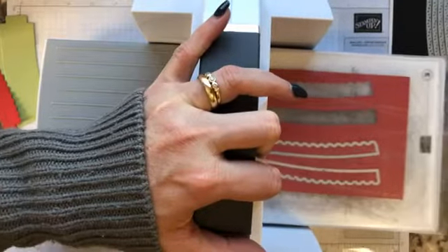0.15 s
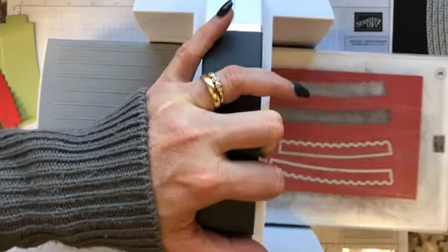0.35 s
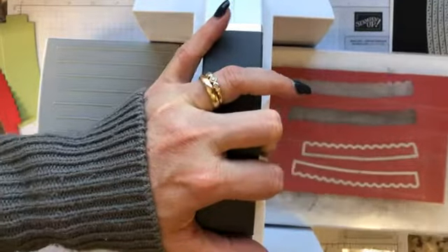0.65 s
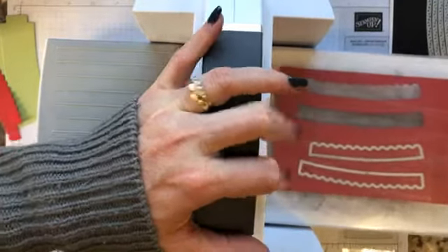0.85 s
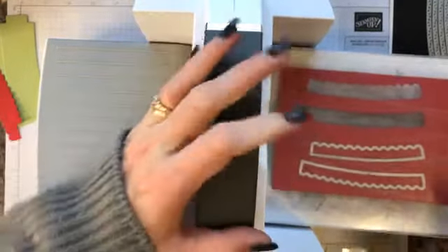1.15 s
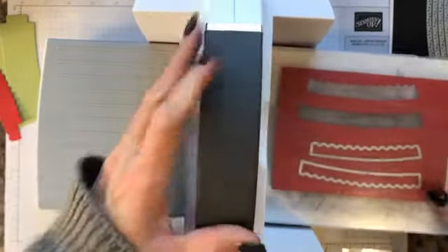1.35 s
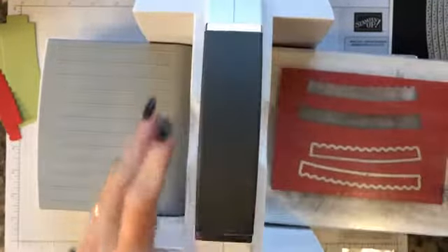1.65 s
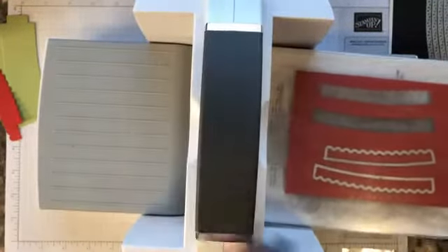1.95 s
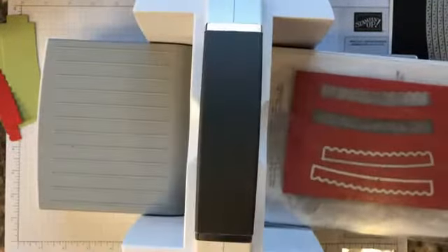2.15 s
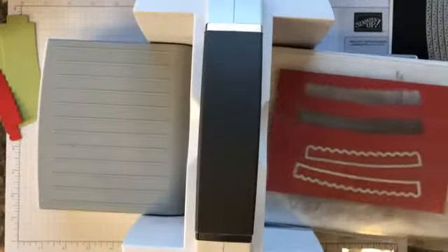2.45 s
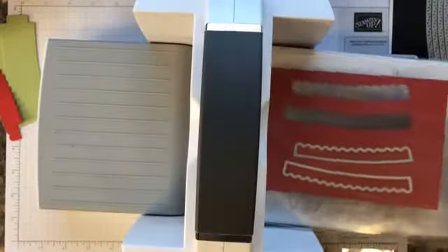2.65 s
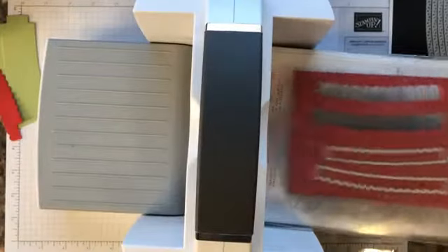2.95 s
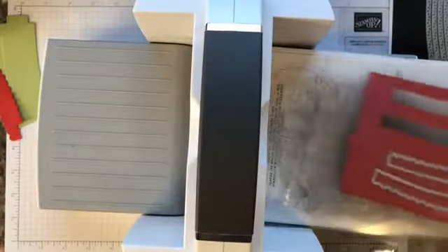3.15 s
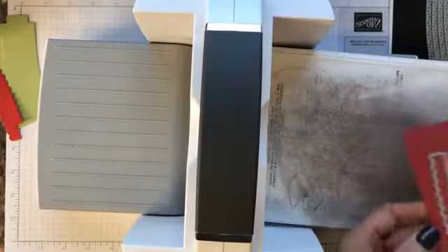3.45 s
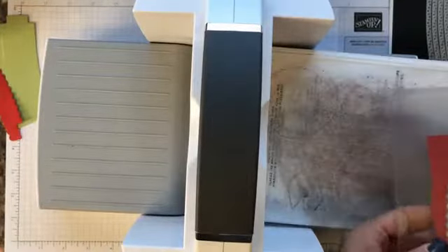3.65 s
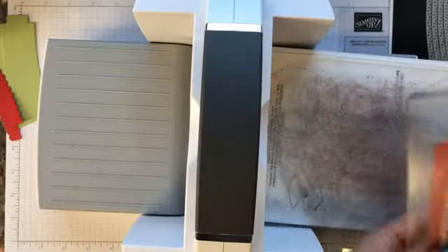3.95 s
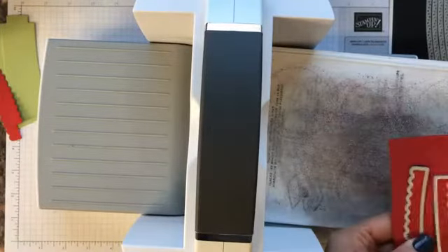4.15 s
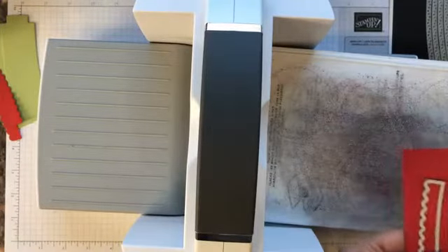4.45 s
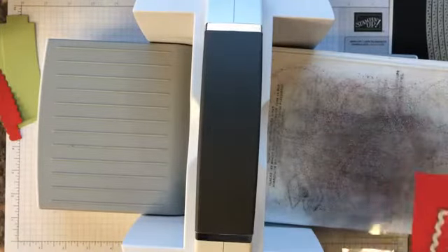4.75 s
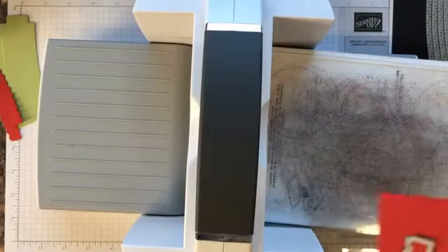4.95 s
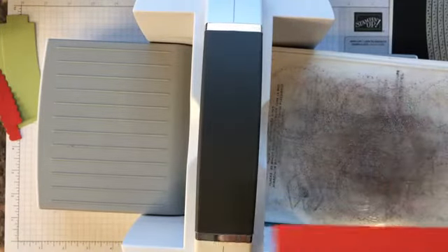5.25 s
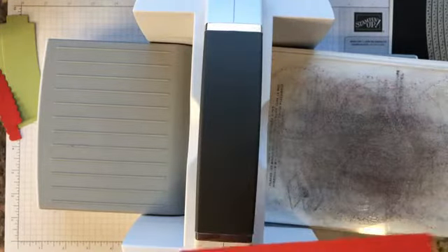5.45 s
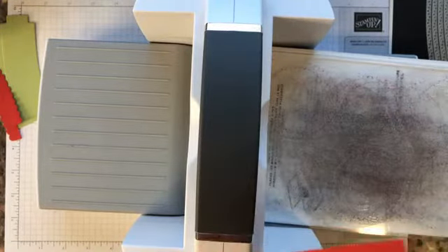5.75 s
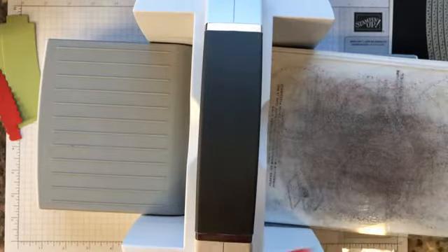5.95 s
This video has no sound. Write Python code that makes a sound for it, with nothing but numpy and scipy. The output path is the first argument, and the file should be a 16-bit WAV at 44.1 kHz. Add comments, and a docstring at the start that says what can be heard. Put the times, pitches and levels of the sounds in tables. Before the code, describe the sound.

Plastic plates knock, creak and rub through a hand-turned craft press, followed by light taps and brief swishes of card in a small room.

```python
"""Hand-cranked die-cutting press

A press on a craft table lets its plates out of the rollers; hands lift and shift them.
Each knock is a short chatter of contacts that excites the modes of the frame and the table.
Plates and card rub, fingertips thud, single modes creak and hum, and a roller squeaks.
A small furnished room reverberates over a quiet noise floor."""
import sys
import numpy as np
from scipy import signal
from scipy.fft import rfft, irfft
from scipy.io import wavfile
from scipy.ndimage import uniform_filter1d

SR = 44100
rng = np.random.default_rng(int(sys.argv[2]) if len(sys.argv) > 2 else 0)


def store_wav(level_fs):
    """Save 16-bit WAV to argv[1]."""
    pcm = np.round(np.clip(np.atleast_2d(level_fs), -1, 1) * 32767)
    wavfile.write(sys.argv[1], SR, pcm.T.astype(np.int16))


N = 269434

# limits of the table, frame, plate, edge, tick and fizz bands: frequency_hz
BAND_LIMITS_HZ = [50, 200, 600, 1500, 4500, 8500, 18000]
# spectrum of bare contact noise: frequency_hz, level_db
CONTACT_SPECTRUM = [(200, 9), (1000, 20), (4000, 10), (7800, -5), (9000, -13.5), (11000, -26), (14500, -9),
                    (17000, -30)]


def knocks(grit_db=2.0, bare_db=-14, favour_db=10, clump_db=2.0, plate_db=-13):
    """Impact excitation: a blow and its chatter ring the modes; the striking point favours some."""
    # hard knocks, with band levels relative to level_db: start_s, level_db, table_db, frame_db,
    # edge_db, tick_db, fizz_db, favoured_frame_hz, favoured_plate_hz, favoured_edge_hz, chatter_t60_s
    hard_knocks = [(0.013, -40.5, -11, -16, -14, -26, -37, 589, 776, 1570, 0.32),
                   (0.045, -29, -15.5, -18, -18.5, -32.5, -46, 476, 574, 1690, 0.22),
                   (0.1, -36.5, -27, -12.5, -17.5, -26, -45, 373, 810, 2000, 0.084),
                   (0.158, -55, -3.5, -14, -3.5, -13.5, -32, 230, 835, 3060, 0.21),
                   (0.393, -34, -6, -7.5, -11, -13, -26, 520, 736, 2620, 0.25),
                   (0.402, -28.5, -30, -9, -13.5, -13.5, -36, 460, 913, 1950, 0.1),
                   (0.534, -39, -34, -16, -14.5, -23, -25, 607, 860, 2740, 0.14),
                   (0.544, -41.5, -12, -7, -9.5, -8, -17.5, 320, 727, 3960, 0.23),
                   (0.76, -39.5, -16, -27, -17, -50, -35, 366, 955, 1800, 0.17),
                   (0.875, -43, -13, -9.5, -9.5, -14, -19, 288, 1010, 1870, 0.41),
                   (0.903, -28.5, -13, -16.5, -14.5, -26, -37, 247, 835, 2360, 0.11),
                   (1.015, -35.5, -26, -31, -25, -23.5, -30, 417, 900, 1700, 0.29),
                   (1.244, -37, -18, -25, -20, -26.5, -39, 415, 1164, 1500, 0.12),
                   (1.368, -39.5, -16.5, -14.5, -17, -20.5, -26.5, 544, 740, 1680, 0.23),
                   (1.575, -37, -33, -12.5, -12.5, -24.5, -32, 258, 1220, 1610, 0.2),
                   (1.664, -48.5, -11.5, -21, -16, -20, -30, 255, 1040, 2250, 0.2),
                   (1.7, -45.5, -32, -14, -22, -17, -35, 229, 684, 2050, 0.2),
                   (1.738, -32.5, -17.5, -44, -28, -19.5, -43, 452, 814, 1430, 0.2),
                   (2.355, -42.5, -13.5, -10, -34, -41, -44, 590, 590, 1740, 0.28),
                   (2.423, -40, -9.5, -10.5, -18.5, -24.5, -28, 592, 673, 2580, 0.3),
                   (2.456, -35.5, -14.5, -31, -17, -20, -21, 288, 696, 2620, 0.15),
                   (2.525, -47, -34, -28, -14, -16, -26, 250, 700, 1800, 0.18),
                   (2.567, -44, -13.5, -17, -40, -32, -31, 310, 770, 1780, 0.088),
                   (2.709, -36.5, -19, -12.5, -4.5, -11.5, -15.5, 442, 890, 1850, 0.3),
                   (2.895, -56.5, -8, -5, -8.5, -45, -32, 224, 1100, 1580, 0.067),
                   (2.967, -52, -29, -10, -17, -48, -32, 276, 870, 1810, 0.17),
                   (3.004, -36, -19, -15.5, -38.5, -30, -37.5, 634, 650, 1830, 0.17),
                   (3.332, -35.5, -54, -3, -12, -19.5, -37, 546, 803, 2500, 0.14),
                   (4.132, -59, -20, -16, -11, -4.5, -10, 466, 740, 3770, 0.12),
                   (4.166, -56.5, -3, -4.5, -9.5, -5, -11, 223, 720, 3960, 0.069),
                   (4.385, -46.5, -45, -17, -3.5, -2.5, -9, 640, 600, 3370, 0.3),
                   (4.562, -72.5, -5, -36, 1, -4, -23, 300, 1430, 1470, 0.16),
                   (4.957, -46.5, -20, -26, -13.5, -11.5, -22, 338, 1040, 2790, 0.34),
                   (5.136, -36.5, -17, -37, -14, -14.5, -40, 348, 1250, 1940, 0.33),
                   (5.367, -49, -2, -10, -6, -5, -13, 256, 750, 2140, 0.12),
                   (5.825, -45, -17, -13.5, -17.5, -20, -32, 470, 750, 1920, 0.18)]
    # soft shoves and short scuffs: the same columns
    soft_shoves = [(0.233, -52.5, -15, -18, -22, -44.5, -39, 450, 680, 1490, 0.083),
                   (0.266, -61.5, 5, 0.5, -14, -22, -28, 205, 805, 1770, 0.16),
                   (0.583, -50, 2.5, -5, -12, -18, -19, 277, 680, 4260, 0.1),
                   (0.622, -42.5, -22, -38, -25, -38, -43, 258, 980, 1650, 0.081),
                   (0.719, -53, -11, -2.5, -17.5, -40, -29, 335, 730, 1570, 0.16),
                   (0.825, -43, -32, -39, -20.5, -56, -42, 409, 684, 1690, 0.044),
                   (0.913, -29.5, -12, -22, -48, -27, -35, 395, 696, 2380, 0.2),
                   (1.034, -37.5, -13.5, -10.5, -15, -25, -29.5, 203, 655, 1500, 0.3),
                   (1.295, -44, -10.5, -18, -26, -49, -36, 598, 685, 1770, 0.39),
                   (1.524, -65, 0, -1, -24, -35, -27, 323, 850, 1520, 0.081),
                   (1.945, -56.5, -24, -5, -30, -17, -19, 285, 685, 1910, 0.2),
                   (2.061, -41, -10, -12.5, -22, -36, -38, 527, 704, 1880, 0.34),
                   (2.091, -35, -23, -19.5, -27, -25.5, -55, 566, 634, 1770, 0.26),
                   (2.279, -44.5, -12, -41, -22, -37, -35, 253, 670, 1567, 0.33),
                   (2.297, -52.5, -10.5, -17, -23, -27, -34, 261, 697, 1650, 0.33),
                   (2.384, -48, -17, -2, -21, -30, -31, 580, 620, 1970, 0.24),
                   (2.625, -43, -22, -36, -12.5, -12.5, -36, 202, 1170, 1670, 0.13),
                   (2.77, -58, -4, 0, -6, -2, -9, 317, 1140, 2720, 0.18),
                   (2.8, -54, -12, -30, -5, -9.5, -19, 255, 1170, 1800, 0.15),
                   (3.077, -64, -5, -23, -20, -6.5, -20, 251, 690, 1900, 0.066),
                   (3.179, -40, -51, -23, -28, -45, -41, 576, 890, 1500, 0.18),
                   (3.195, -40.5, -44, -19, -19, -50, -41, 530, 940, 1650, 0.26),
                   (3.511, -67.5, -19, -10, -5.5, -6, -15, 523, 1180, 3700, 0.15),
                   (3.601, -64, -26, -21, -31, -1, -8.5, 277, 643, 4600, 0.38),
                   (3.916, -50, -24, -22, -12.5, -8.5, -14, 338, 700, 1860, 0.15),
                   (3.993, -58.5, -24, -27, -12.5, -6.5, -13, 436, 1370, 4370, 0.36),
                   (4.802, -60.5, -7.5, -21, -6, -9.5, -24, 206, 1010, 2780, 0.22),
                   (5.198, -48, -16, -18, -24, -20, -32, 340, 1160, 2770, 0.14),
                   (5.931, -51.5, -18.5, -9.5, -15, -15, -22, 460, 1120, 1530, 0.13),
                   (6.071, -64.5, -7, -14, -9, -10, -18, 320, 956, 1820, 0.18)]
    rows = np.vstack([hard_knocks, soft_shoves])
    start_s, level_db, table_db, frame_db, edge_db, tick_db, fizz_db = rows[:, :7].T
    favoured_hz, chatter_t60_s = rows[:, 7:10], rows[:, 10:11]
    hard = np.arange(len(rows))[:, None] < len(hard_knocks)
    blow_db, rise_s = np.where(hard, 18, 6), np.where(hard, 0.001, 0.0056)
    t = np.arange(int(.3 * SR)) / SR
    envelope = (1 - np.exp(-t / rise_s)) * from_db(-60 * t / chatter_t60_s)
    force = contact_noise((len(rows), len(t)), grit_db) * envelope
    clumps = rng.standard_normal((len(rows), len(t) // 180 + 1))   # the chatter comes in 4 ms clumps
    force *= from_db(clump_db * np.repeat(clumps, 180, axis=1)[:, :len(t)])
    force[:, :9] += from_db(blow_db) * np.hanning(11)[1:-1] / 4   # first blow: a rounded 0.2 ms pulse
    modes = body_modes()
    scatter_db = rng.normal(0, 2, (len(rows), len(modes)))
    sound = from_db(bare_db) * hollows(coloured(force, CONTACT_SPECTRUM))
    for k, (hz, mode_db, t60_s) in enumerate(modes):
        nearness = np.exp(-(np.log(favoured_hz / hz) / 0.1) ** 2).max(axis=1, keepdims=True)
        gain = from_db(mode_db + favour_db * nearness + scatter_db[:, k:k + 1])
        sound += (-1) ** k * gain * resonator(force, hz, t60_s)
    out = np.zeros(N + len(t))
    fade = np.minimum(1, (t[-1] - t) / .08)
    for band, band_db in zip(bands(sound), [table_db, frame_db, plate_db, edge_db, tick_db, fizz_db]):
        loudest_rms = np.sqrt(np.max(uniform_filter1d(band ** 2, size=600), axis=1))   # over 14 ms
        pieces = (from_db(level_db + band_db) / loudest_rms)[:, None] * band * fade
        for at, piece in zip(np.round(start_s * SR).astype(int), pieces):
            out[at:at + len(t)] += piece
    return out[:N]


def body_modes():
    """Material damping: plastic limits each mode's decay time to 70 cycles or 0.22 s."""
    # modes of press, plates and table top: frequency_hz, level_db, uncapped_t60_s
    modes = [(58.4, -13, 0.24), (92.3, 8.5, 0.51), (128, 0.5, 0.023), (162.1, 6, 0.07),
             (256.7, -0.5, 0.082), (343.5, 12.5, 0.065), (363, 7.5, 0.035), (476, 11, 0.047),
             (577, 5.5, 0.071), (694, 14, 0.044), (766, 4, 0.027), (862.6, 15, 0.13), (1007, 4, 0.06),
             (1140.6, 13.5, 0.24), (1547, -15, 0.047), (1623, 5, 0.095), (1860, -4, 0.055), (2070, 7, 0.21),
             (2380, -11, .06), (2840, -47, 0.042), (3370, -12.5, 0.18), (3980, -37.5, 0.027),
             (4000, -29, 0.028), (5590, -41.5, 0.093)]
    return [(hz, level_db, min(t60_s, 70 / hz, .22)) for hz, level_db, t60_s in modes]


def hollows(force, ripple_db=4, count=70):
    """Cavity colouring: each blow meets the plates' hollows differently and gets its own ripple."""
    size = force.shape[1]
    hz = np.arange(1, size // 2 + 2) * SR / size
    place = np.log(hz / 500) / np.log(40) * count   # log axis from 500 Hz to 20 kHz
    humps = np.clip(rng.standard_normal((len(force), count)), -2, 1.2)
    gain_db = [ripple_db * np.interp(place, np.arange(count), row) for row in humps]
    return irfft(rfft(force) * from_db(gain_db), size)


def thuds():
    """Damped oscillation: a fingertip pushes once on a hollow that barely rings."""
    # fingertips on card and plate: start_s, level_db, pitch_hz, t60_s
    pushes = [(3.005, -30, 633, 0.016), (3.334, -35.5, 345, 0.13), (4.169, -34, 229, 0.024),
              (5.368, -50, 270, 0.024)]
    out, t = np.zeros(N), np.arange(int(.15 * SR)) / SR
    for start_s, level_db, hz, t60_s in pushes:
        envelope = from_db(level_db - 60 * t / t60_s) * (1 - np.exp(-t * hz * 2))
        out[round(start_s * SR):][:len(t)] += envelope * np.sin(2 * np.pi * hz * t)
    return out


def hums(waver=0.023, shake_db=3):
    """Single-mode resonance: fed by a slip or a blow, a near-pure tone swells, wavers and sinks."""
    # creaks and hums: start_s, decay_s, pitch_hz, level_db
    tones = [(.047, 0.049, 428, -64), (0.403, 0.039, 436, -47), (0.57, 0.055, 99.4, -48.5),
             (0.918, 0.026, 95.3, -35), (1.019, 0.036, 680, -52), (1.576, 0.061, 272, -44),
             (1.94, 0.067, 148, -51.5), (2.271, 0.052, 681, -52.5), (2.287, 0.034, 1610, -54),
             (2.295, 0.051, 257, -49), (2.42, 0.074, 670, -53), (2.97, 0.021, 259, -51),
             (3.186, 0.032, 878, -53), (3.225, 0.13, 1390, -50.5), (3.36, 0.04, 448, -49.5),
             (4.965, 0.061, 152, -57.5), (4.953, 0.11, 321, -59.5), (5.138, 0.086, 317.5, -53),
             (0.044, 0.014, 1720, -41.5), (.93, 0.028, 3590, -46.5), (1.574, 0.026, 1895, -46.5),
             (3.4, 0.11, 486, -72), (5.14, 0.062, 1400, -53.5), (5.823, 0.021, 262, -57)]
    out = np.zeros(N)
    pitch_ratio, shake = 1 + waver * drift(27.0), from_db(shake_db * drift(46))
    for start_s, decay_s, hz, level_db in tones:
        at = round(start_s * SR)
        age = np.arange(int(2 * decay_s * SR)) / (decay_s * SR)
        phase = 2 * np.pi * np.cumsum(hz * pitch_ratio[at:at + len(age)]) / SR
        envelope = np.minimum(1, 5 * age) * np.exp(-age ** 3)
        out[at:at + len(age)] += from_db(level_db) * envelope * np.sin(phase)
    return out * shake


def rubbing(grit_db=-4.0, bare_db=-12, wander_db=5.0, catch_db=1.0, frame_db=-7.5, plate_db=-9):
    """Frictional excitation: the plates catch and let go, feeding now one mode, now another."""
    # plates straining in the press: time_s, level_db, relative_table_db, relative_brightness_db
    strain = [(0.0, -39, -10, -32), (0.16, -73, 3, -30), (0.43, -54, -3, -18), (0.6, -65, 0, -22),
              (0.82, -52, -12, -33.5), (0.95, -66, -9, 8), (1.07, -65, 10, -19.5), (1.39, -65.5, -3.5, -6),
              (1.49, -55, -8, -22), (1.58, -72.5, 9, -12), (1.74, -73, 9, -5), (2.08, -58.5, -15, -15),
              (2.32, -64, -3, -18.5), (2.41, -62, 6, -8.5), (2.61, -78.5, 9, 1.5), (2.78, -55, -8, -4),
              (2.88, -68.5, 5, -25), (3.0, -66.5, -3, -17), (3.09, -78, 4, -3.5), (3.21, -55.5, -22, -24.5),
              (3.33, -54.5, -14, -8.5), (3.5, -82, 8, -12)]
    force = contact_noise(N, grit_db) * from_db(catch_db * drift(29))
    sound = from_db(bare_db) * coloured(force, CONTACT_SPECTRUM)
    for k, (hz, mode_db, t60_s) in enumerate(body_modes()):
        drive = force * from_db(mode_db + wander_db * drift(14.0))
        sound += (-1) ** k * resonator(drive, hz, t60_s)
    table, frame, plate, edge, tick, fizz = bands(sound)
    level_db, table_db, bright_db = contours(strain)
    layers = [(table, table_db), (frame, frame_db), (plate, plate_db),
              (edge, bright_db + 4), (tick + fizz, bright_db)]
    return sum(from_db(level_db + band_db) * unit_rms(band) for band, band_db in layers)


def sliding(grit_db=2.0, rumble_db=-3.5):
    """Sliding friction: fine, even contacts of card on plastic make a broadband swish."""
    # card and plate sliding in the hands, one list a stroke: time_s, level_db, relative_brightness_db
    strokes = [
        [(3.15, -84, -30), (3.212, -58, -15), (3.318, -49.5, -22), (3.42, -72, -20)],
        [(3.55, -81, -22), (3.712, -81.5, -21.5), (3.962, -80.5, -9.5), (4.16, -75, 6.5)],
        [(4.17, -74, -1), (4.34, -55.5, 2), (4.404, -60.5, 5), (4.544, -76, 3), (4.62, -94, -12)],
        [(4.95, -78, -18), (5.15, -69.5, -10), (5.278, -70, -11), (5.412, -70, -2), (5.48, -87, -18)],
        [(5.8, -72, -10), (5.864, -65.5, -15), (5.988, -65.5, -5), (6.11, -75.5, -14)],
    ]
    # friction spectrum of card: frequency_hz, density_db
    card_spectrum = [(60, -32), (250, -13.5), (900, -7.5), (1400, 10.5), (3000, 11), (6000, 5), (8000, 3.5),
                     (9500, -3), (13000, -10), (16000, -7.5)]
    friction = coloured(contact_noise(N, grit_db), card_spectrum)
    table, frame, plate, edge, tick, fizz = bands(friction)
    swish = from_db(rumble_db) * unit_rms(table + frame) + unit_rms(plate + edge)
    hiss = unit_rms(tick + fizz)
    return sum(from_db(level_db) * (swish + from_db(bright_db) * hiss)
               for level_db, bright_db in map(contours, strokes))


def squeaks(t60_s=0.002, rise_s=0.011, fall_s=0.043):
    """Stick-slip: fast slips of rubber on steel give a broad, noisy whistle and its octave."""
    # roller squeaks: start_s, length_s, pitch_hz, level_db, relative_octave_db
    whistles = [(0.15, 0.013, 6770, -72, -22), (0.744, 0.015, 10000, -71, -5),
                (1.029, 0.0089, 7230, -45.5, -13), (2.037, 0.051, 6940, -70, -23),
                (4.375, 0.0083, 5800, -44.5, -20)]
    out, t = np.zeros(N), np.arange(int(.25 * SR)) / SR
    for start_s, length_s, hz, level_db, octave_db in whistles:
        slip = rng.standard_normal((2, len(t)))
        octave_hz = min(2 * hz, .45 * SR)
        low = unit_rms(resonator(resonator(slip[0], hz, t60_s), hz, t60_s))
        high = unit_rms(resonator(resonator(slip[1], octave_hz, t60_s / 2), octave_hz, t60_s / 2))
        envelope = np.minimum(1, t / rise_s) * np.exp(-np.maximum(t - length_s, 0) / fall_s)
        whistle = low + from_db(octave_db) * high
        out[round(start_s * SR):][:len(t)] += from_db(level_db) * envelope * whistle
    return out


def room(x, build_s=0.01):
    """Reverberation: dense echoes build up, then die away at each band's own rate."""
    # reverberation times of the furnished room: frequency_hz, t60_s
    decay_times = [(100, 0.063), (500, 0.27), (2000, 0.38), (6000, 0.19), (14000, 0.3)]
    t = np.arange(int(.5 * SR)) / SR
    centres_hz = np.sqrt(np.multiply(BAND_LIMITS_HZ[1:], BAND_LIMITS_HZ[:-1]))
    echoes = bands(rng.standard_normal(len(t)))
    tail = sum(band * from_db(-60 * t / at_hz(decay_times, hz)) for band, hz in zip(echoes, centres_hz))
    tail *= 1 - np.exp(-t / build_s)
    return signal.fftconvolve(x, tail / np.sqrt(np.sum(tail ** 2)))[:N]


def air(level_db=-74):
    """Ambient noise: a steady random floor, strongest in the bass."""
    # spectrum of the quiet room: frequency_hz, density_db
    air_spectrum = [(25, -18), (50, 6), (65, -1), (110, 6.5), (160, -3), (250, 0), (630, -4), (1000, -9),
                    (2000, -14.5), (4000, -14), (6500, -12.5), (8500, -16), (10500, -21.5), (16000, -24.5)]
    return from_db(level_db) * unit_rms(coloured(rng.standard_normal(N), air_spectrum))


def contact_noise(shape, grit_db):
    """Surface roughness: many small contacts of uneven strength add up to noise."""
    return rng.standard_normal(shape) * from_db(grit_db * np.minimum(rng.exponential(1, shape), 5))


def resonator(force, hz, t60_s):
    """Forced response of one damped mode, with gain 1 at resonance."""
    radius, angle = from_db(-60 / (t60_s * SR)), 2 * np.pi * hz / SR
    feedforward = np.array([1, 0, -1]) * (1 - radius ** 2) / 2
    return signal.lfilter(feedforward, [1, -2 * radius * np.cos(angle), radius ** 2], force + 1e-18)


def bands(x):
    """Filter bank: six bands, with alternating signs so that neighbours add where they meet."""
    return [(-1) ** k * signal.sosfilt(signal.butter(2, pair, "band", fs=SR, output="sos"), x)
            for k, pair in enumerate(zip(BAND_LIMITS_HZ, BAND_LIMITS_HZ[1:]))]


def coloured(x, spectrum):
    """Spectral shaping: weight the last axis by a smooth curve in dB."""
    size = x.shape[-1]
    hz = np.arange(1, size // 2 + 2) * SR / size
    return irfft(rfft(x) * from_db(at_hz(spectrum, hz)), size)


def drift(rate_hz, step=40):
    """Random modulation: low-passed noise of rms 1."""
    pole = np.exp(-2 * np.pi * rate_hz * step / SR)
    noise = rng.standard_normal(N // step + 2002)
    slow = signal.lfilter([1], [1, -2 * pole, pole * pole], noise)[2000:]
    return np.interp(np.arange(N) / step, np.arange(len(slow)), unit_rms(slow))


def contours(rows):
    """Interpolation in time; the first curve, a level, is silent outside the rows."""
    time_s, level_db, *others = np.transpose(rows)
    t = np.arange(N) / SR
    level_curve = np.interp(t, time_s, level_db, left=-150, right=-150)
    return [level_curve] + [np.interp(t, time_s, column) for column in others]


def at_hz(points, hz):
    """Interpolation on a log-frequency axis."""
    points_hz, values = np.transpose(points)
    return np.interp(np.log(hz), np.log(points_hz), values)


def from_db(db):
    """Amplitude ratio of a level in dB."""
    return 10 ** (np.asarray(db) / 20)


def unit_rms(x):
    """Normalisation to rms 1."""
    return x / np.sqrt(np.mean(x ** 2) + 1e-20)


def scene(room_db=-16):
    """Superposition: the direct sound of press and hands, the steady air and the room's echoes."""
    direct = knocks() + thuds() + hums() + rubbing() + sliding() + squeaks()
    return (direct + air() + from_db(room_db) * room(direct))[None]


def record(dry, bass_hz=50, stop_hz=16250):
    """Band limiting: a small microphone loses the deep bass, and the top is cut steeply."""
    thin = signal.sosfilt(signal.butter(2, bass_hz, "high", fs=SR, output="sos"), dry)
    return signal.sosfilt(signal.cheby2(20, 60, stop_hz, fs=SR, output="sos"), thin)


dry = scene()
out = record(dry)
store_wav(out)
```